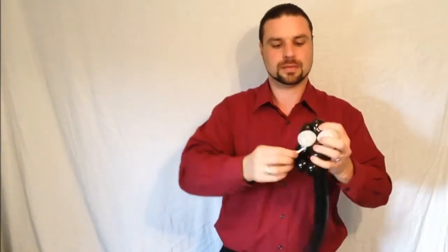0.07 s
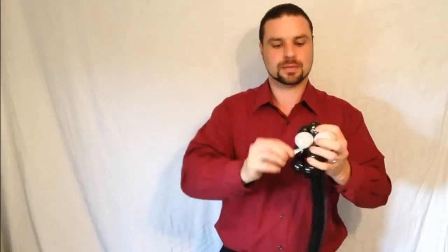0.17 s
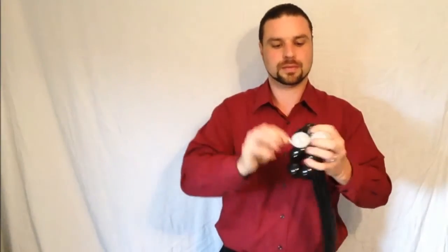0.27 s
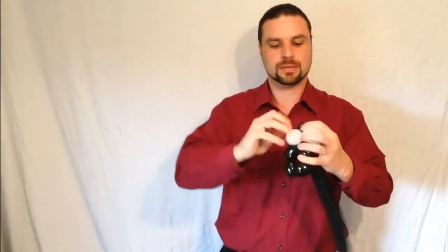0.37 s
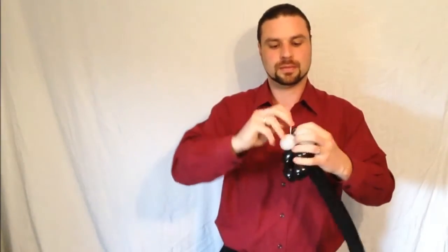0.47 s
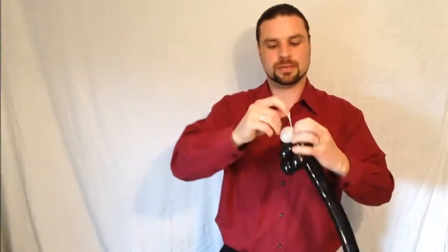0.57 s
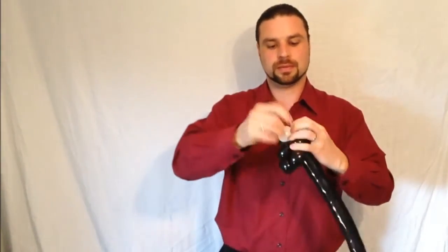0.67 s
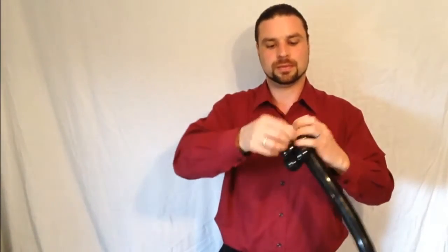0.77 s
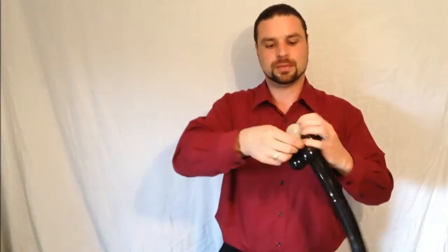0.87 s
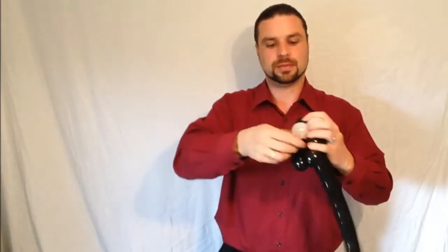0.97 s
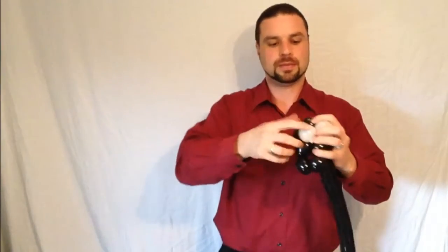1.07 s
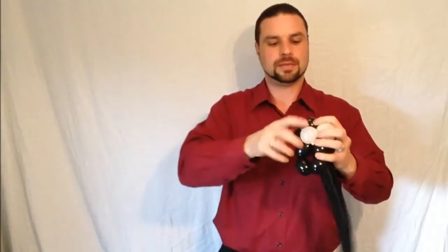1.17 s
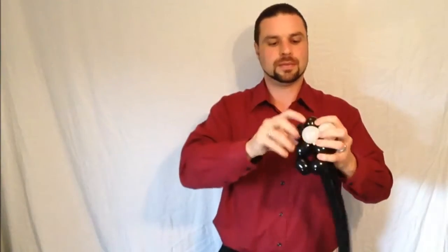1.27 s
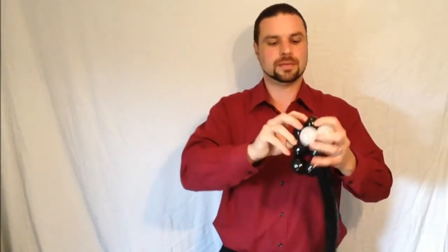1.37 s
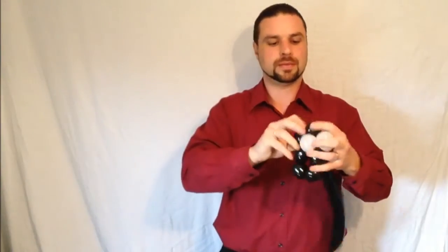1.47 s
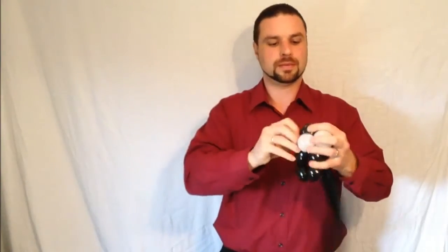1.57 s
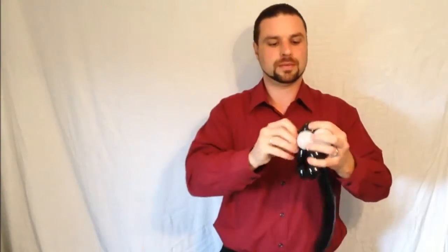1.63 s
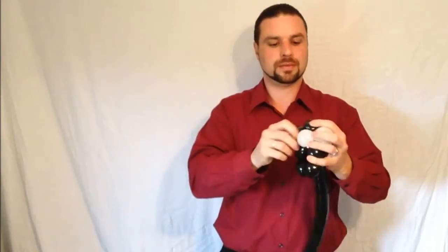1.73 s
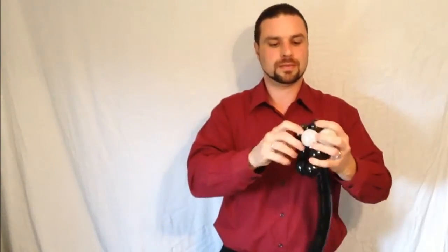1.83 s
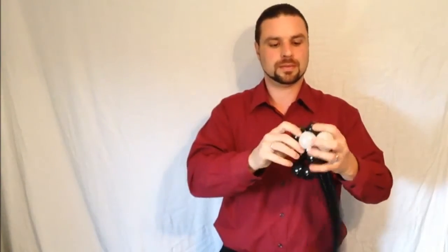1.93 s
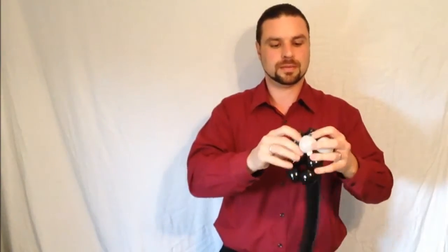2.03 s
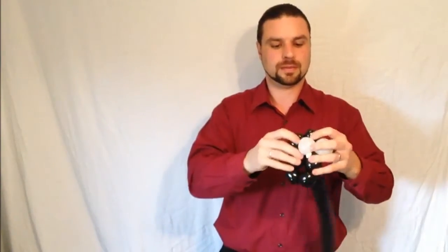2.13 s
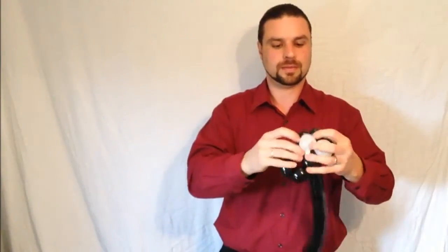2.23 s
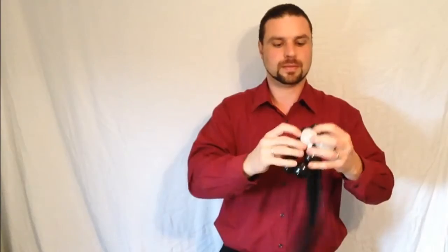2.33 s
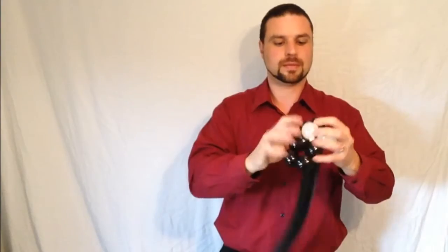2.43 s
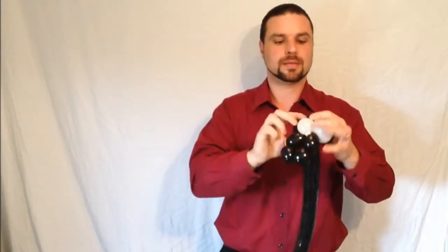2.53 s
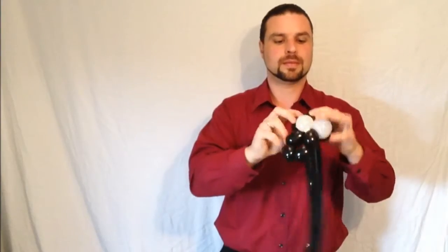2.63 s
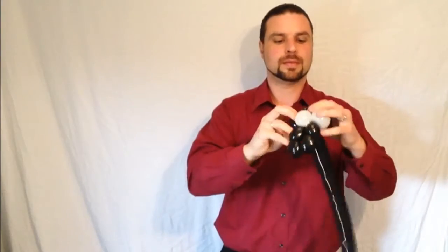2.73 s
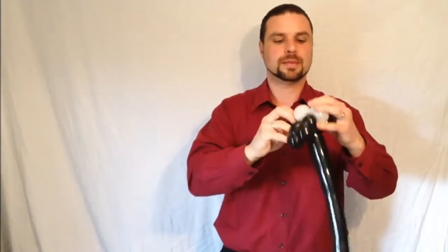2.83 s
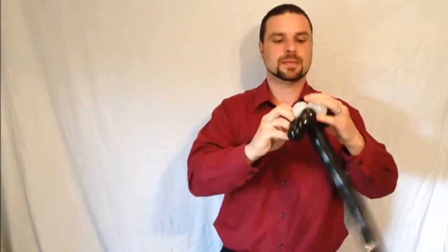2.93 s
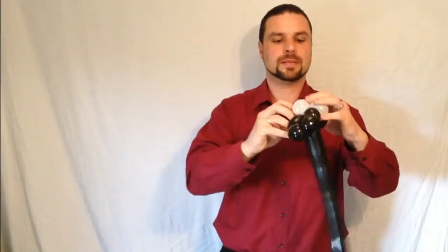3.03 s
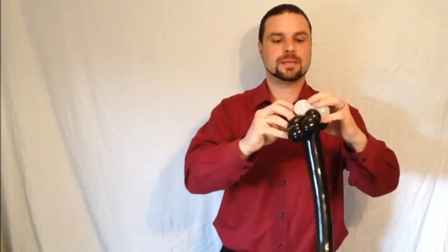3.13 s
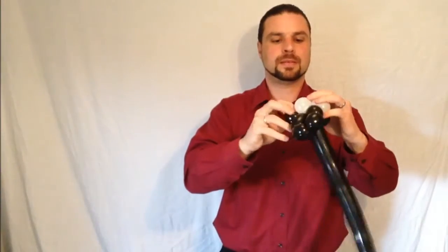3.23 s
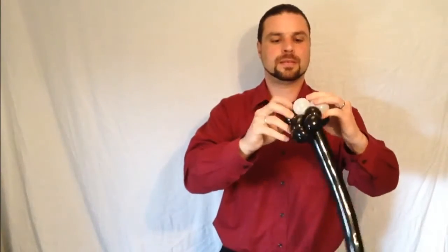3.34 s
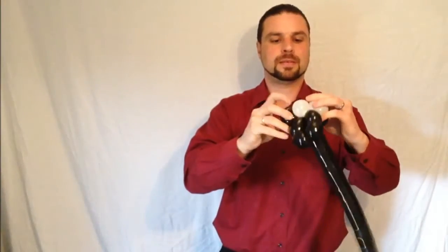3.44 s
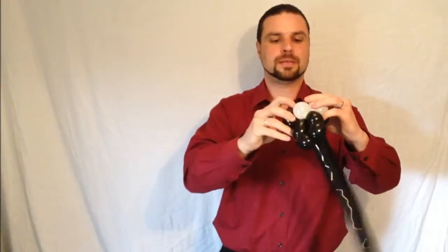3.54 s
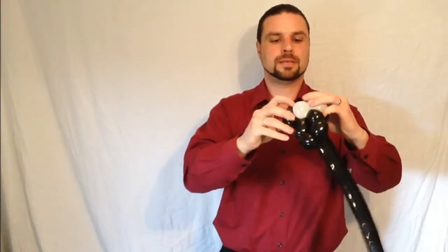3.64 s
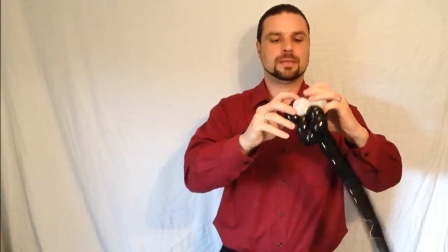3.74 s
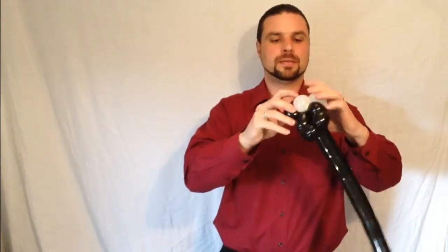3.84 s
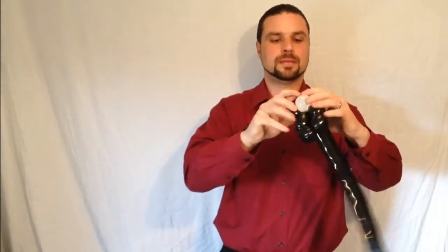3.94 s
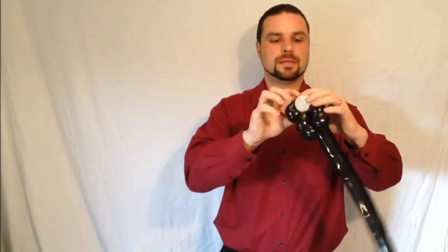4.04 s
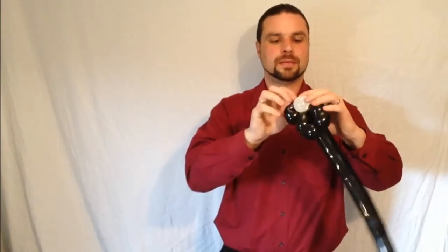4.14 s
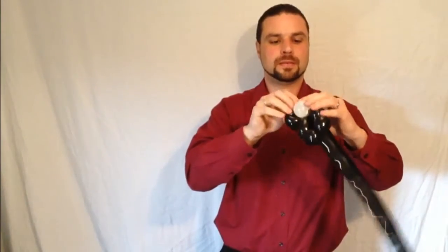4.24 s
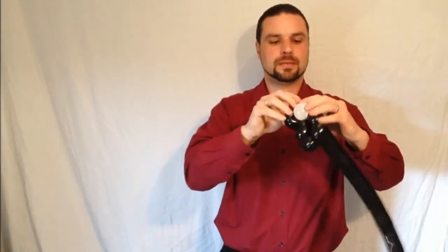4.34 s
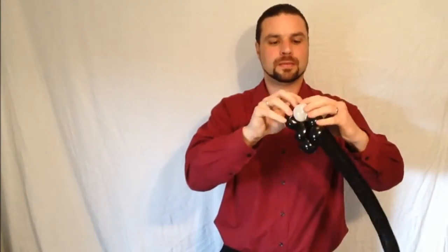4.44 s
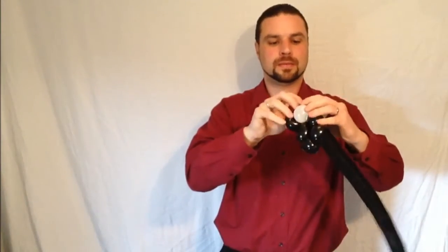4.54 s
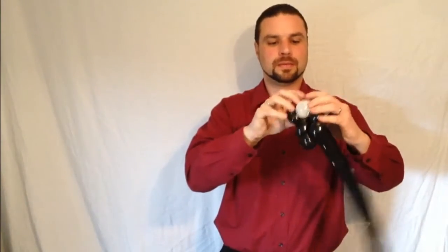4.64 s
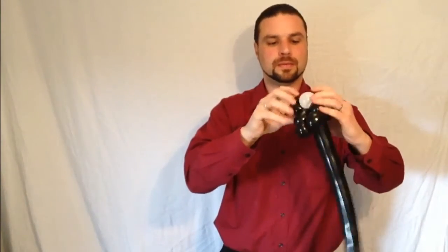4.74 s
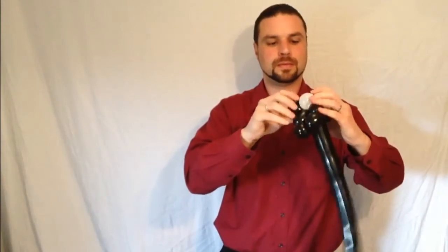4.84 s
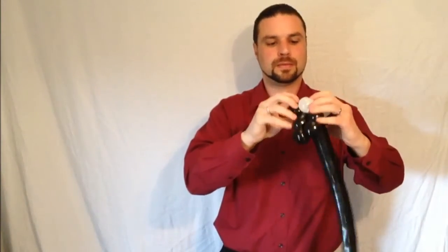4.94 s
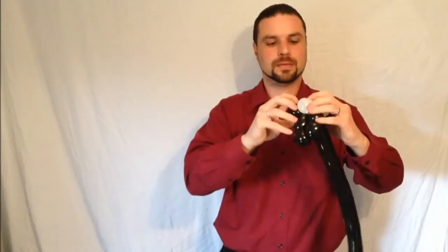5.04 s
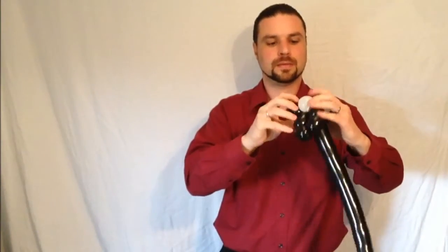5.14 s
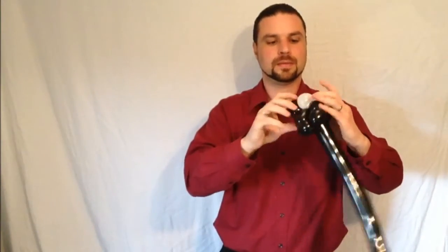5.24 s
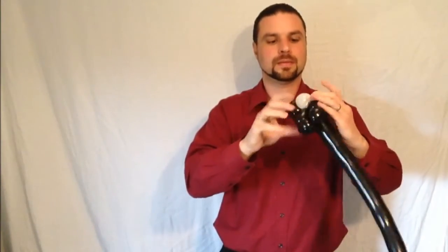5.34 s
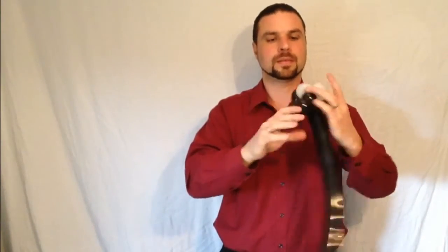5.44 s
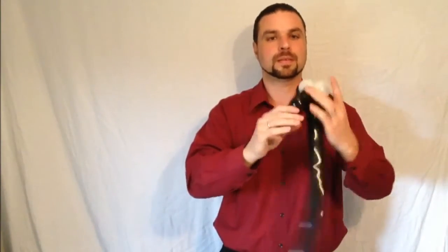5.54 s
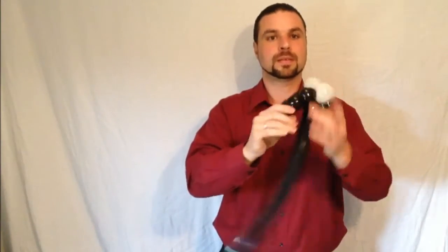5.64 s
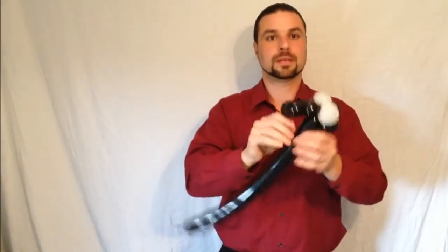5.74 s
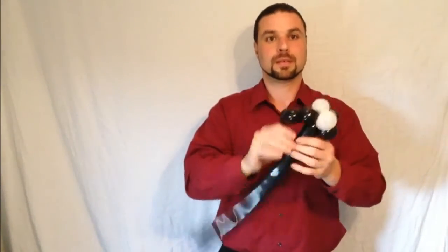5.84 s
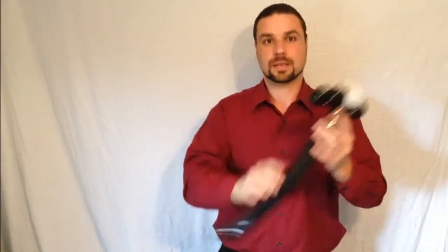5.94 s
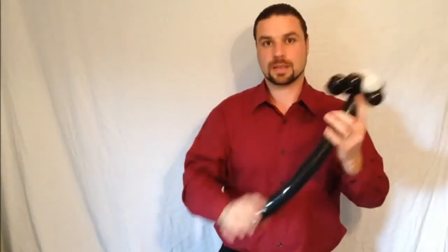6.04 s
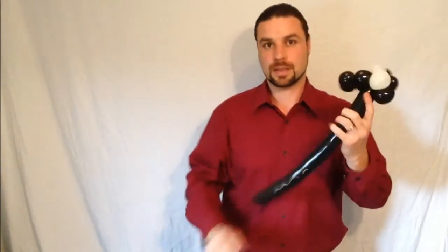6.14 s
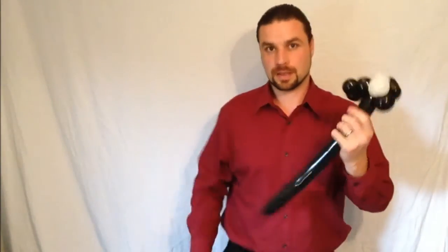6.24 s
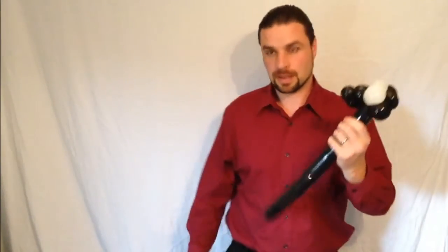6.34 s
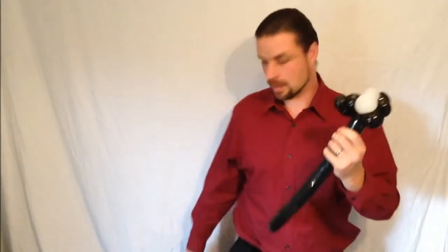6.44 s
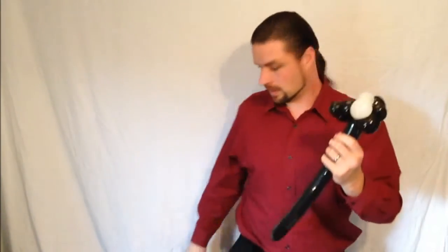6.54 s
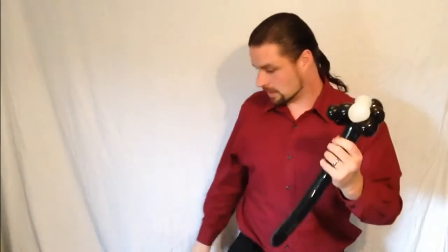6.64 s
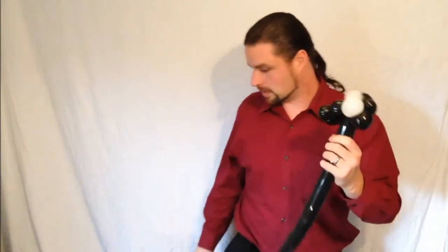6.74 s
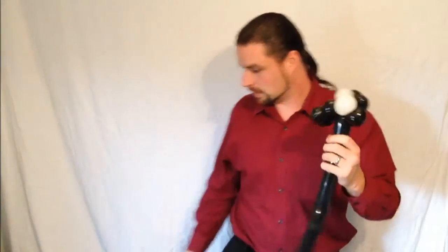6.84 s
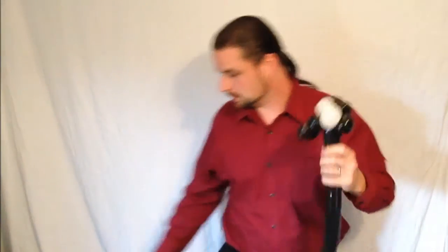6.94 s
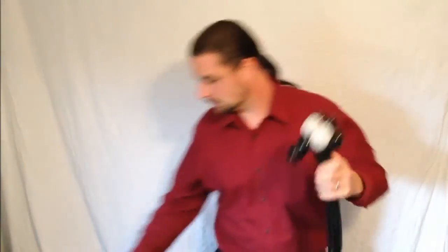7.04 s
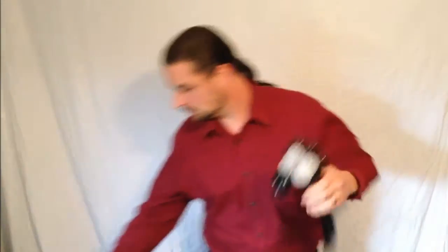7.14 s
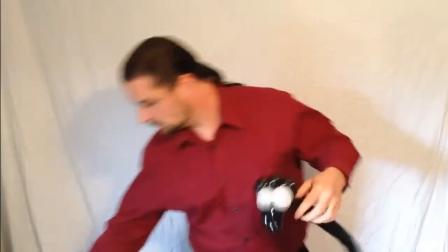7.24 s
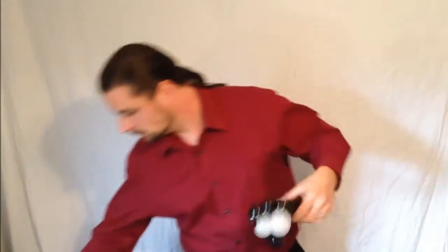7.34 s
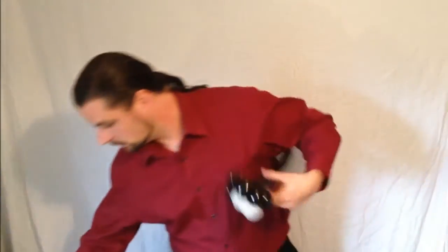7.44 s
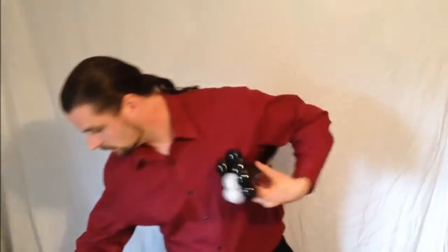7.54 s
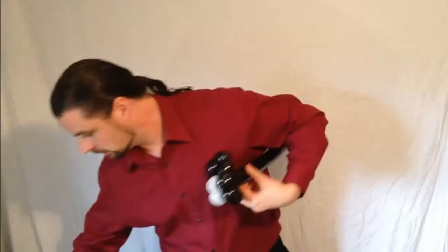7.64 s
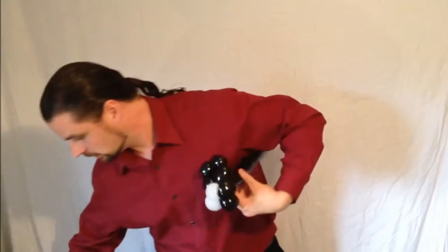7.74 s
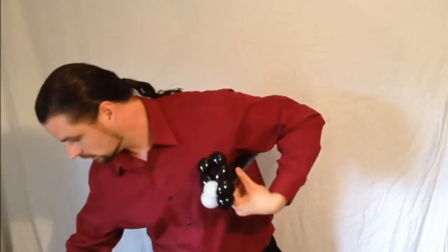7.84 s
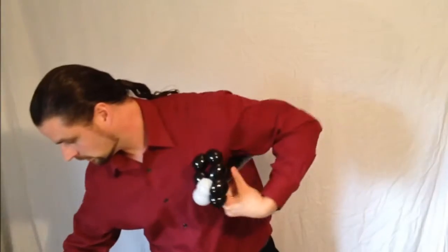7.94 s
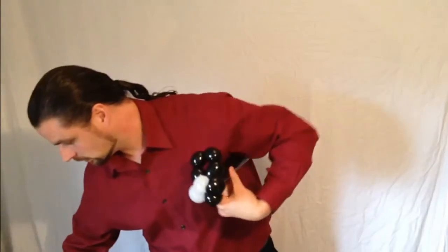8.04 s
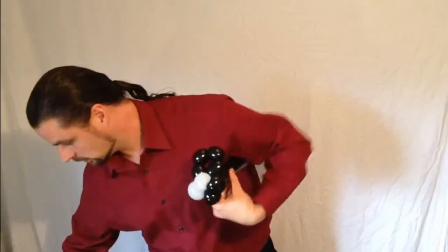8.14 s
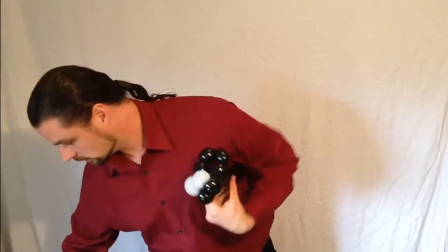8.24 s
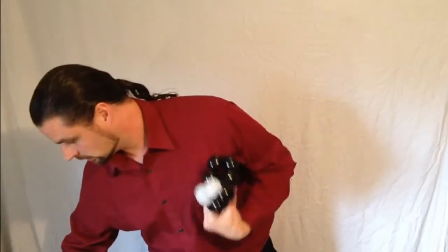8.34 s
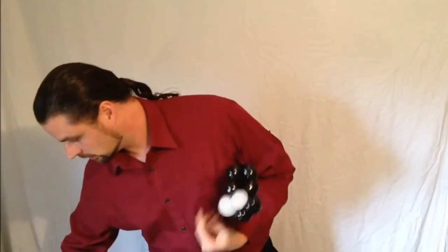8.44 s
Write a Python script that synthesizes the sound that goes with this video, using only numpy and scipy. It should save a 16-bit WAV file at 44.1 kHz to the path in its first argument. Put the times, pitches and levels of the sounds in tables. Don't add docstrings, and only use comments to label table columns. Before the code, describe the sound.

Close rubbery rubbing, crackly pops and short squeaks of balloons being twisted together, fading after five seconds into soft handling and cloth swishes.

```python
import sys
import numpy as np
from scipy import signal
from scipy.fft import rfft, irfft
from scipy.io import wavfile
from scipy.ndimage import uniform_filter1d, map_coordinates

SR = 44100
rng = np.random.default_rng(int(sys.argv[2]) if len(sys.argv) > 2 else 0)


def decibels_to_gain(level_db):
    exponent = np.asarray(level_db, float) / 20
    return 10 ** exponent


def transcribe(signal):
    frames = np.atleast_2d(signal).T
    limited = np.clip(frames, -1, 1)
    pcm = np.round(limited * 32767).astype(np.int16)
    wavfile.write(sys.argv[1], SR, pcm)


N = 374850

# start t/s, length t/s, rubbing level/dB, fizz level/dB, squeeze level/dB (last two re rubbing)
DRAGS = [(0, 0.07, -34, -2.5, -3.5), (0.241, 0.27, -35, -1.5, -6), (0.432, 0.23, -29, -5.5, -9),
         (.68, 0.025, -44, -14, -19), (0.752, 0.037, -42, 1, -9.5), (0.838, 0.18, -37.5, -8, -18),
         (0.916, .27, -32.5, -7, -5), (1.267, 0.15, -40, -3, -10.5), (1.429, 0.45, -24, -4, -10.5),
         (1.871, 0.25, -32.5, -4, -7.5), (2.168, 0.2, -31.5, -3, -6), (2.402, 0.074, -29.5, -8.5, -10.5),
         (2.659, 0.34, -39, -3, -8), (2.79, 0.23, -30, -6, -14.5), (3.075, 0.58, -30, -6, -13.5),
         (3.51, 0.2, -56, -10, -2), (3.563, 0.26, -29.5, -10.5, -13.5), (3.919, 0.066, -38.5, -6, -6),
         (4.069, 0.077, -38, -8, -7.5), (4.213, 0.21, -25.5, -6.5, -18), (4.5, 0.13, -28, -2.5, -11.5),
         (4.686, 0.017, -60, -13, -2), (4.81, 0.019, -43, -5, -7.5), (4.925, 0.33, -40, -3, -7)]
# middle t/s, half length t/s, rubbing, fizz, squeeze level/dB
TURNS = [(0.188, 0.041, -48, 0.5, -10), (1.204, 0.027, -38, -11, -4), (5.858, 0.06, -57.5, -3, -18),
         (6.315, 0.028, -58, -13, -10.5), (1.437, 0.014, -14.5, -1.5, -33), (1.784, 0.022, -16, -4.5, -33),
         (2.142, 0.031, -24.5, -6, -27), (2.58, 0.065, -31.5, -10, -5), (2.997, 0.063, -21.5, -9.5, -17),
         (3.16, 0.021, -26, -3, -31), (3.417, 0.027, -24, -5.5, -11), (3.816, 0.046, -33, -9.5, -9.5),
         (4.399, 0.03, -30, 4.5, -26), (5.012, 0.1, -36, -9, -26), (5.22, 0.05, -39, -6, -5),
         (5.366, 0.033, -37.5, -9.5, -19), (5.755, 0.066, -54, 0.5, -9), (5.973, 0.028, -59, -4, -14),
         (6.07, 0.11, -49.5, -9, -7), (6.226, 0.08, -52, -5, -7.5), (6.554, 0.054, -67.5, -5.5, -8),
         (7.166, 0.024, -51, -16, -9)]
# f/Hz, level/dB
SKIN_SPECTRUM = [(180, -35.5), (300, -20), (420, -14.5), (1000, 0.5), (2100, 0.5), (5000, -5), (9000, -24),
                 (15500, -31)]
# f/Hz, level/dB
FIZZ_SPECTRUM = [(1760, -40), (3000, 6), (5800, 2), (8200, -4), (11000, -5), (15000, -8.5)]
# f/Hz, level/dB
TUBE_SPECTRUM = [(24, -74.5), (40, -39.5), (92, -29), (261, -4), (313, -8), (407, -1), (451, -4),
                 (694, -4.5), (900, -4), (1170, -38), (1980, -120)]
# f/Hz, width f/Hz, level/dB
BUBBLES = [(700, 220, -6.5), (950, 530, -7), (1360, 270, 5), (1780, 740, -5.5), (2190, 230, 3),
           (2550, 350, -14.5), (3730, 1300, -9.5)]
# t/s, peak level/dB, bubble f/Hz, crack level/dB
JOINING = [(.046, -19.5, 1890, 1.5), (0.247, -16, 310, -24), (.299, -15.5, 1350, -3),
           (0.338, -26, 1340, -11), (0.359, -20.5, 480, -40), (0.405, -15.5, 2040, -22),
           (0.444, -1, 2080, -31), (.678, -10, 1200, -17), (0.697, -13.5, 2320, -35),
           (.754, -5.5, 1430, -44), (.818, -3, 1240, -59.5), (.922, -4, 2100, -59),
           (1.275, -5.5, 3380, -29), (1.357, -13.5, 1230, -16.5), (1.432, -10, 2630, -27),
           (1.59, -19, 1860, -2.5), (1.622, -4, 3170, -14), (1.647, -7.5, 2040, -11),
           (1.686, -3.5, 2720, -8), (1.759, -11, 1390, -1), (1.859, -12, 2040, -11),
           (1.921, -14.5, 1390, -26), (2.005, -10.5, 2020, -13), (2.2, -10, 1930, -17),
           (2.238, -7.5, 1350, -5), (2.404, -7, 2200, -9), (2.48, -16, 755, -37.5),
           (2.529, -17.5, 1360, -39), (2.566, -18.5, 666, -23)]
# t/s, peak level/dB, bubble f/Hz, crack level/dB
TUCKING = [(2.659, -24.5, 2450, -25), (2.749, -18, 950, -12), (2.775, -20.5, 1940, 1),
           (2.821, 4, 1585, -24), (3.239, -7.5, 2200, -11.5), (3.323, -15, 1310, -8), (3.42, -9, 710, -1.5),
           (3.578, -13.5, 1350, -11), (3.6, -7, 1930, -1), (3.923, -22, 1510, -11),
           (4.054, -27.5, 1920, -26), (4.079, -20.5, 2350, -10), (4.211, -26, 1640, -32),
           (4.234, -22, 2200, -8), (4.366, -17, 1900, -10), (4.387, -6, 930, -13), (4.488, -21, 1090, -16),
           (4.509, -7, 1780, -12), (4.643, -8, 2820, -32), (4.704, -20.5, 2320, -22),
           (4.798, -30.5, 800, -9), (4.827, -27, 1610, -12), (4.907, -31, 795, -23),
           (4.971, -20.5, 940, -8), (5.002, -21.5, 1000, -27), (5.084, -15.5, 2310, -13),
           (5.124, -13.5, 815, -15), (5.175, -23, 2300, -20), (5.263, -22.5, 930, -4)]
# t/s, peak level/dB, bubble f/Hz, crack level/dB
TICKS = [(0.18, -30, 1180, -12), (0.232, -23, 1120, -15), (0.255, -21, 780, -15), (0.384, -31, 2070, -21),
         (0.566, -18, 2030, -19.5), (0.897, -21, 2200, -10), (1.071, -29.5, 2160, -14.5),
         (1.143, -23.5, 829, -15), (1.236, -23, 1220, -14), (1.304, -23.5, 2230, -18),
         (1.402, -16, 821, -20), (1.755, -10.5, 1430, -12.5), (2.096, -21, 2500, -15),
         (2.136, -12.5, 2100, -15), (2.152, -13, 2210, -10), (2.168, -17, 2030, -19),
         (2.29, -32, 2690, -17), (2.557, -22, 1350, -15), (2.704, -25.5, 1340, -15),
         (2.851, -15.5, 2570, -14), (2.883, -20, 1230, -15.5), (2.968, -15, 1290, -15),
         (3.118, -16.5, 1440, -17), (3.143, -15, 2100, -18), (3.15, -11, 2220, -15),
         (3.297, -23, 754, -16.5), (3.367, -16.5, 2780, -13), (3.513, -37.5, 1470, -15),
         (3.76, -30, 2260, -17), (3.903, -24, 1500, -15), (3.965, -25, 1560, -15),
         (4.218, -19, 1660, -14.5), (4.549, -9.5, 2940, -13), (4.656, -16, 785, -19),
         (4.921, -21, 953, -15), (4.942, -20, 918, -15), (5.044, -24, 1580, -17), (5.347, -28, 2310, -15),
         (5.353, -28, 1170, -15)]
# t/s, peak level/dB, bubble f/Hz, crack level/dB
LEADS = [
    (.433, -18, 1920, -15),
    (.738, -20.5, 2230, -15),
    (.809, -19, 1900, -6),
    (1.616, -11.5, 3240, -16),
    (1.748, -12.5, 1390, -12.5),
    (2.231, -6.5, 2050, -28),
]
# t/s, peak level/dB, bubble f/Hz, crack level/dB, thump level/dB
TAPS = [(5.499, -38.5, 606, -23, -29), (5.544, -32, 2280, -32, -13), (5.557, -18.5, 2280, -39, -15.5),
        (5.686, -34.5, 292, 1, 2), (5.724, -28, 523, -23, -9), (5.949, -32.5, 1290, -25, -3),
        (6.115, -33.5, 786, -16, -21), (6.243, -30, 950, -12, -18), (6.894, -31, 1630, -13.5, -35.5),
        (6.942, -24, 1250, -8, -21), (7.067, -37, 1580, -26, -19), (7.09, -25, 1260, -13, -5),
        (7.287, -36, 623, -43, 7.5), (7.423, -44, 560, -9.5, -32), (7.643, -53, 565, -18.5, -9.5),
        (7.7, -56, 600, -15, -9), (7.733, -41.5, 503, -23.5, -10), (8.223, -39.5, 535, -10.5, -17),
        (8.414, -32, 474, -9, -24)]
# start t/s, end t/s, start f/Hz, end f/Hz, level/dB
SQUEAKS = [(.44, 0.505, 500, 520, -37.5), (0.814, .855, 700, 670, -34), (.84, 0.885, 1364, 1220, -38),
           (1.488, 1.539, 1200, 1500, -44.5), (1.756, 1.802, 1414, 1430, -29), (1.89, 1.911, 479, 570, -36),
           (2.128, 2.146, 2014, 2200, -28), (2.922, 3.04, 1300, 1390, -33), (3.249, 3.302, 700, 690, -42.5),
           (3.629, 3.691, 888, 830, -38.5), (4.274, 4.332, 373, 445, -35), (5.118, 5.128, 816, 1030, -33),
           (5.977, 6.006, 1380, 1450, -50.5), (6.07, 6.106, 776, 815, -53), (6.193, 6.206, 740, 780, -49.5),
           (6.233, 6.253, 950, 1030, -57), (7.163, 7.194, 857, 850, -58.5), (0.82, 0.826, 2190, 2090, -42),
           (3.547, 3.577, 700, 760, -45), (3.698, 3.732, 737, 800, -44), (5.894, 5.91, 790, 820, -57),
           (1.422, 1.45, 787, 850, -30.5), (2.018, 2.042, 1320, 1350, -34), (4.248, 4.305, 760, 720, -44),
           (4.262, 4.303, 1123, 1260, -35), (5.994, 6.009, 1560, 1700, -52),
           (6.012, 6.032, 1460, 1410, -57), (6.02, 6.04, 790, 820, -58), (6.044, 6.062, 570, 570, -55),
           (6.125, 6.15, 820, 790, -56), (7.832, 7.9, 680, 570, -61), (7.883, 7.954, 510, 610, -67.5),
           (1.175, 1.22, 1360, 1500, -43)]
# t/s, f/Hz, level/dB, t60 t/s
RINGS = [(.817, 700, -15.5, 0.078), (.817, 1410, -11, 0.071), (.817, 2170, -11.5, .04),
         (.818, 2600, -22, .025), (2.238, 280, -20.5, .08), (1.686, 400, -20.5, 0.065),
         (3.42, 268, -28.5, 0.054), (.922, 2700, -20, 0.035), (1.9, 2050, -19, .03),
         (2.23, 2060, -13.5, .04), (.754, 1390, -27, 0.026), (4.387, 780, -19, 0.043),
         (4.387, 1200, -22.5, .05), (1.647, 2060, -18, 0.036)]
# start t/s, end t/s, start slip rate f/Hz, end slip rate f/Hz, level/dB
CREAKS = [
    (4.91, 5.075, 65, 170, -40.5),
    (1.417, 1.455, 600, 740, -19.5),
    (1.745, 1.83, 145, 360, -20.5),
    (2.944, 3.044, 250, 320, -26.5),
    (3.133, 3.186, 300, 380, -29),
]
# middle t/s, half length t/s, swish level/dB, rumple level/dB re swish
CLOTH = [
    (5.737, 0.05, -68.5, 21),
    (6.093, 0.039, -70, 20),
    (7.313, .03, -66, 9),
    (7.421, .02, -62, -4.5),
    (7.542, 0.055, -59, -4.5),
    (7.786, 0.12, -66.5, 7),
    (7.943, 0.23, -59, -4),
    (8.234, 0.075, -54, -6),
    (8.348, 0.073, -51.5, -17),
    (8.458, 0.097, -56.5, 5.5),
]
# f/Hz, level/dB
SWISH_SPECTRUM = [(600, -6.0), (1500, 2.0), (4000, -0.5), (15000, -5)]
RUMPLE_SPECTRUM = [(60, -37.5), (150, -1.5), (550, 2.0), (1500, -13.5), (5000, -51.0)]
# t/s, level/dB
WALLS = [(.0078, -8), (.0115, -15), (.017, -16), (.027, -12)]
# f/Hz, t60 t/s
ROOM_T60 = [(200, 0.41), (600, 0.2), (1500, 0.17), (4000, 0.042), (10000, 0.18)]
# f/Hz, level/dB
HISS_SPECTRUM = [(15, -44), (25, -20), (37, -25.5), (79, -22.5), (109, -9.5), (143, -1), (337, -3.5),
                 (365, -10.5), (396, -4), (15200, -12.5)]

GRAB_DB_PER_S, SAG_DB_PER_S, RELEASE_DB_PER_S = 696, 29.5, 254.5
SWELL_EDGE_DB, SWELL_POWER = 10, 1.5
SLIDE_DB, SLIDE_DECAY_DB_PER_S = -18, 370
SLIDE_FIZZ_PER_CRACK, SLIDE_SQUEEZE_DB, SLIDE_SQUEEZE_PER_THUMP = 0.26, -3, 0.41
THUMP_DB, THUMP_PER_SQUEEZE = 6, 2.02
TICK_DB = -4
SLAP_DB, SLAP_PER_CRACK = 4, .12
SNAP_RISE_S, CRACK_RISE_S, RING_RISE_S = 0.00092, 0.0009, 0.0019
OVERTONES_DB, DULLER_DB_PER_OCTAVE = -7, 10.5
RING_SAG_PER_S = .9
HISS_DB = -63


def unit(x):
    return x / np.sqrt(np.mean(x ** 2) + 1e-20)


def along(points, hz):
    f, v = np.transpose(points)
    return np.interp(np.log(hz + 1), np.log(f + 1), v)


def coloured(x, spectrum):
    gain = decibels_to_gain(along(spectrum, np.fft.rfftfreq(4096, 1 / SR)))
    cepstrum = irfft(np.log(gain + 1e-6))
    cepstrum[1:2048] *= 2
    cepstrum[2049:] = 0
    impulse = irfft(np.exp(rfft(cepstrum)))
    return signal.fftconvolve(x, impulse)[:N]


def slips(per_s, spread_db, smooth):
    happens = rng.random(N) < per_s / SR
    size = np.minimum(rng.exponential(size=N), 2.5)
    grains = happens * decibels_to_gain(spread_db * size) * np.sign(rng.standard_normal(N))
    share = np.clip(smooth, 0, 1)
    return np.sqrt(1 - share) * unit(grains) + np.sqrt(share) * rng.standard_normal(N)


def wobble(knots_per_s):
    knots = rng.standard_normal(N // 100)
    return map_coordinates(knots, [np.arange(N) * knots_per_s / SR])


def clock():
    return np.arange(0, N / SR + .002, .001)


def swells(middle_s, half_s):
    distance = np.abs((clock() - middle_s[:, None]) / half_s[:, None])
    return -SWELL_EDGE_DB * distance ** SWELL_POWER


def summed(shape_db, db):
    power = np.sum(decibels_to_gain(2 * (shape_db + db[:, None])), axis=0) + 1e-12
    return np.interp(np.arange(N) / SR, clock(), 10 * np.log10(power))


def strokes():
    start_s, length_s, *drag_db = np.transpose(DRAGS)
    middle_s, half_s, *turn_db = np.transpose(TURNS)
    since_s = clock() - start_s[:, None]
    released_s = np.maximum(since_s - length_s[:, None], 0)
    falling = -SAG_DB_PER_S * since_s - RELEASE_DB_PER_S * released_s
    drags = np.where(since_s < 0, GRAB_DB_PER_S * since_s, falling)
    return np.vstack([drags, swells(middle_s, half_s)]), *np.hstack([drag_db, turn_db])


def thumped():
    shape, rub, fizz, squeeze = strokes()
    share_db = summed(shape, rub + squeeze) - summed(shape, rub)
    ticks = [(s, db + TICK_DB, hz, crack_db) for s, db, hz, crack_db in TICKS]
    out = []
    for row in JOINING + TUCKING + LEADS + ticks:
        squeeze_db = share_db[round(row[0] * SR) + 200]
        out.append((*row, THUMP_DB + THUMP_PER_SQUEEZE * squeeze_db))
    return out


def held(db):
    out, wait, jump = db.copy(), round(.025 * SR), round(.012 * SR)
    pause_db = 10 * np.exp(-(np.arange(jump) / SR / .005) ** 2)
    for s, *_ in JOINING + TUCKING + TAPS:
        a = max(round(s * SR), wait)
        out[a - wait:a] = np.minimum(out[a - wait:a], out[a - wait] + 3)
        out[a:a + jump] = np.maximum(db[a:a + jump], db[a + jump]) - pause_db
    return uniform_filter1d(out, size=100)


def pressure():
    shape, rub, fizz, squeeze = strokes()
    s, db, hz, crack_db, thump_db = np.transpose(thumped() + TAPS)
    since_s = clock() - s[:, None]
    slide = np.where(since_s < 0, -200, -SLIDE_DECAY_DB_PER_S * since_s)
    shape = np.vstack([shape, slide])
    rub = np.r_[rub, db + SLIDE_DB]
    fizz = np.r_[fizz, SLIDE_FIZZ_PER_CRACK * crack_db]
    squeeze = np.r_[squeeze, SLIDE_SQUEEZE_DB + SLIDE_SQUEEZE_PER_THUMP * thump_db]
    rub_db = summed(shape, rub)
    stick_db = held(rub_db) - rub_db
    return rub_db + stick_db, summed(shape, rub + fizz) + stick_db, summed(shape, rub + squeeze) + stick_db


def bubbles():
    out = np.zeros(N)
    for hz, width_hz, db in BUBBLES:
        resonance = signal.iirpeak(hz, hz / width_hz, SR)
        ring = signal.lfilter(*resonance, slips(150, spread_db=2.5, smooth=.1))
        out += decibels_to_gain(db + 2.6 * wobble(14)) * unit(ring)
    return unit(out)


def singing():
    out = np.zeros(N)
    for start_s, end_s, *_ in SQUEAKS:
        out[round(start_s * SR):round(end_s * SR)] = 1
    return uniform_filter1d(out, size=500)


def rubbing():
    rub_db, fizz_db, squeeze_db = pressure()
    grip = wobble(85)
    shared = slips(800, spread_db=4.5, smooth=.15)
    scrape = unit(coloured(shared, SKIN_SPECTRUM))
    body = unit(decibels_to_gain(3.2 * grip) * (scrape + 0.62 * bubbles()))
    body = body * decibels_to_gain(-8 * singing())
    fine = shared + 1.4 * slips(2000, spread_db=4.5, smooth=.4)
    fizz = unit(decibels_to_gain(2.2 * grip) * coloured(fine, FIZZ_SPECTRUM))
    squeezed = coloured(slips(480, spread_db=2.0, smooth=0.7), TUBE_SPECTRUM)
    tube = unit(decibels_to_gain(3.1 * wobble(25)) * squeezed)
    return decibels_to_gain(rub_db - 1.5) * body + decibels_to_gain(fizz_db + 0.57) * fizz + decibels_to_gain(squeeze_db - 3.0) * tube


def snaps():
    out, t = np.zeros(N + SR), np.arange(SR // 20) / SR
    for s, db, hz, crack_db, thump_db in thumped() + TAPS:
        noise = rng.standard_normal((2, len(t)))
        swell = 1 - np.exp(-t / SNAP_RISE_S)
        ring = swell * decibels_to_gain(-t * (2299.5 + 1.0 * hz)) * np.sin(2 * np.pi * hz * t)
        top_hz = np.clip(1200 + 1.4 * hz, 900, 9000)
        skin = signal.butter(2, [500, top_hz], "band", fs=SR, output="sos")
        blow = signal.sosfilt(skin, (t == t[20]) + 0.3 * decibels_to_gain(-60 * t / 0.007) * noise[0])
        slap = decibels_to_gain(SLAP_DB + SLAP_PER_CRACK * crack_db) * blow / np.abs(blow).max()
        crack_swell = 1 - np.exp(-t / CRACK_RISE_S)
        crack = decibels_to_gain(crack_db + 8 - 60 * t / 0.0068) * crack_swell * np.diff(noise[1], prepend=0)
        thump_hz = 500 * decibels_to_gain(1.5 * np.tanh(noise[1, 0]))
        thump = decibels_to_gain(thump_db - 2 - 60 * t / 0.021) * np.sin(2 * np.pi * thump_hz * t)
        out[round((s + .0008) * SR):][:len(t)] += decibels_to_gain(db - 5.0) * (ring + slap + crack + thump)
    return out[:N]


def squeaks():
    out = np.zeros(N)
    for start_s, end_s, hz0, hz1, db in SQUEAKS:
        over_db = min(OVERTONES_DB - DULLER_DB_PER_OCTAVE * np.log2(hz0 / 700), -6.5)
        a, b = round(start_s * SR), round(end_s * SR)
        u = np.linspace(0, 1, b - a)
        shake = unit(uniform_filter1d(rng.standard_normal((2, SR // 4)), size=110))[:, :b - a]
        glide_hz = hz0 + (hz1 - hz0) * u
        unsteady = 1 + .03 * (hz0 + 500) / 1500 * shake[0]
        phase = 2 * np.pi * np.cumsum(glide_hz * unsteady) / SR
        overtones = sum(np.sin(k * phase + k * k) / (k - 1) ** 0.59 for k in range(2, 7))
        tone = np.sin(phase) + decibels_to_gain(over_db) * overtones
        swell = np.sin(np.pi * u ** (.55 * (hz1 / hz0) ** 6))
        out[a:b] += decibels_to_gain(db + 4 + 2.5 * shake[1]) * swell * tone
    return out


def rings():
    out, t = np.zeros(N + SR), np.arange(SR // 5) / SR
    for s, hz, db, t60_s in RINGS:
        shake = unit(uniform_filter1d(rng.standard_normal((2, len(t))), size=150))
        phase = 2 * np.pi * hz * np.cumsum(1 - RING_SAG_PER_S * t + .02 * shake[0]) / SR
        swell = 1 - np.exp(-t / RING_RISE_S)
        decay = decibels_to_gain(db + 3.5 * shake[1] - 60 * t / t60_s)
        out[round(s * SR):][:len(t)] += decay * swell * np.sin(phase)
    return out[:N]


def creaks():
    out = np.zeros(N)
    for start_s, end_s, rate0_hz, rate1_hz, db in CREAKS:
        a, b = round(start_s * SR), round(end_s * SR)
        scatter = rng.standard_normal((2, SR // 4))[:, :b - a]
        rate_hz = np.linspace(rate0_hz, rate1_hz, b - a)
        turns = np.cumsum(rate_hz / SR * np.abs(1 + 1.0 * scatter[0]))
        beats = np.diff(np.floor(turns), prepend=0) * decibels_to_gain(3.3 * scatter[1])
        out[a:b] += decibels_to_gain(db) * unit(beats) * np.hanning(b - a) ** 1.4
    pulse = coloured(np.arange(N) == 0, SKIN_SPECTRUM)
    return coloured(out, SKIN_SPECTRUM) / np.linalg.norm(pulse)


def cloth():
    middle_s, half_s, swish_db, rumple_db = np.transpose(CLOTH)
    shape = swells(middle_s, half_s)
    swish = coloured(slips(2900, spread_db=7.0, smooth=.6), SWISH_SPECTRUM)
    rumple = coloured(slips(300, spread_db=-5.0, smooth=0.53), RUMPLE_SPECTRUM)
    swish = unit(decibels_to_gain(0.8 * wobble(30)) * swish)
    rumple = unit(decibels_to_gain(1.1 * wobble(23)) * rumple)
    swish_gain = decibels_to_gain(summed(shape, swish_db - 0.66))
    rumple_gain = decibels_to_gain(summed(shape, swish_db + rumple_db - 5.0))
    return swish_gain * swish + rumple_gain * rumple


def room(x):
    out, hop = np.zeros(N + SR), SR // 12
    padded = np.pad(x, (hop, 2 * hop))
    for a in range(-hop, N, hop):
        hz, t, z = signal.stft(rng.standard_normal(SR // 3), SR, nperseg=256)
        decay = decibels_to_gain(-60 * t / along(ROOM_T60, hz)[:, None])
        tail = signal.istft(z * decay, SR, nperseg=256)[1]
        tail = decibels_to_gain(-8.5) * tail / np.linalg.norm(tail)
        answer = np.pad(tail, (round(.0075 * SR), 0))
        for s, db in WALLS:
            answer[round(s * SR) + rng.integers(60)] += decibels_to_gain(db)
        piece = padded[a + hop:][:2 * hop] * np.hanning(2 * hop)
        wet = signal.fftconvolve(piece, answer)[max(-a, 0):]
        out[max(a, 0):][:len(wet)] += wet
    return out[:N]


def hiss():
    return decibels_to_gain(HISS_DB) * unit(coloured(rng.standard_normal(N), HISS_SPECTRUM))


def scene():
    balloons = rubbing() + snaps() + squeaks() + rings() + creaks()
    small = signal.butter(3, 150, "high", fs=SR, output="sos")
    near = signal.sosfilt(small, balloons) + cloth()
    return (near + room(near) + hiss())[None]


def band_limit(x):
    return signal.sosfilt(signal.butter(12, 16620, fs=SR, output="sos"), x)


def record(dry):
    rounded = dry / (1 + np.abs(dry / 1.3) ** 4) ** (1 / 4)
    low_cut = signal.butter(1, 60, "high", fs=SR, output="sos")
    top_cut = signal.ellip(8, .5, 45, 15350, fs=SR, output="sos")
    mix = signal.sosfilt(np.vstack([low_cut, top_cut]), rounded)
    return band_limit(mix)


dry = scene()
out = record(dry)
transcribe(out)
```